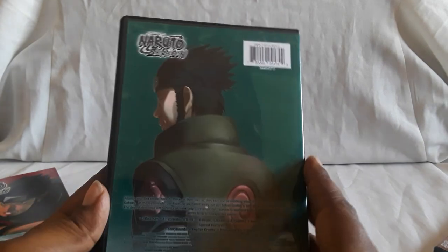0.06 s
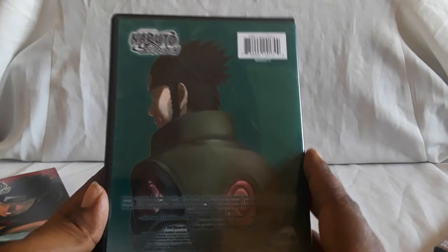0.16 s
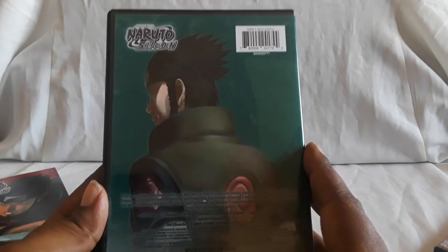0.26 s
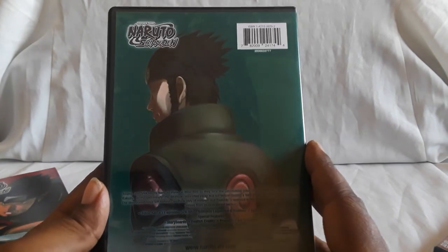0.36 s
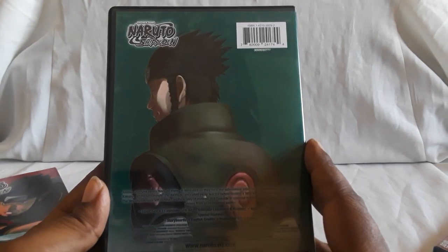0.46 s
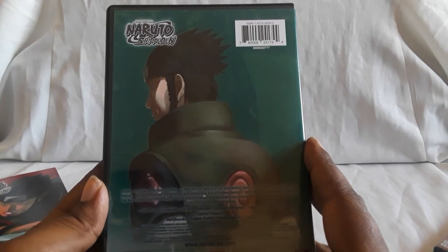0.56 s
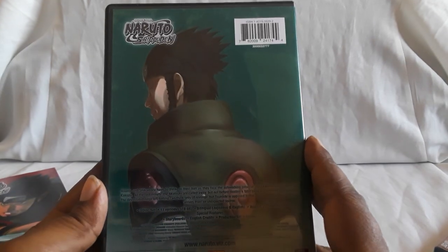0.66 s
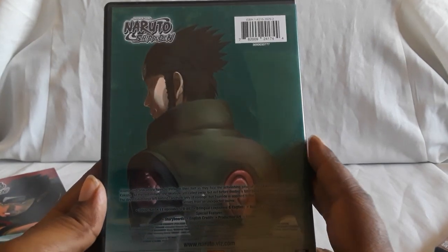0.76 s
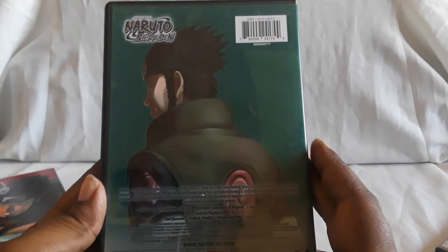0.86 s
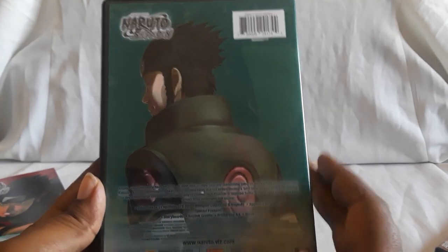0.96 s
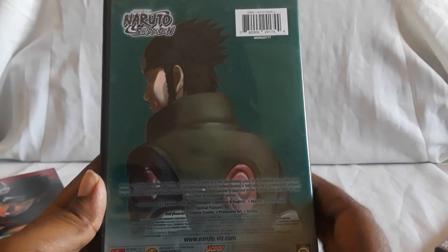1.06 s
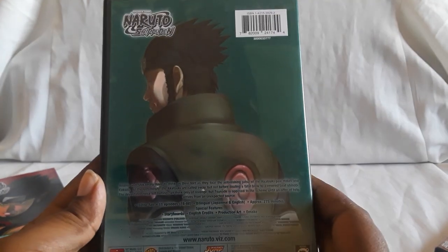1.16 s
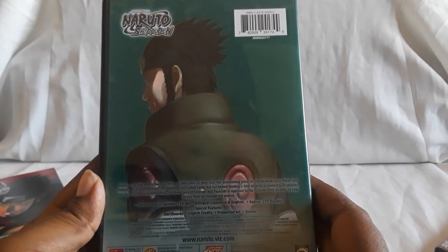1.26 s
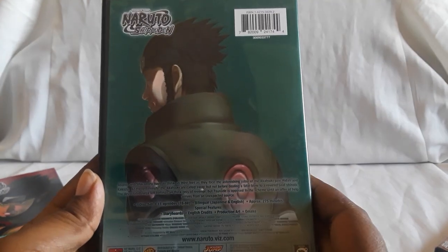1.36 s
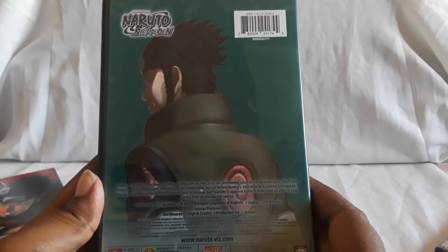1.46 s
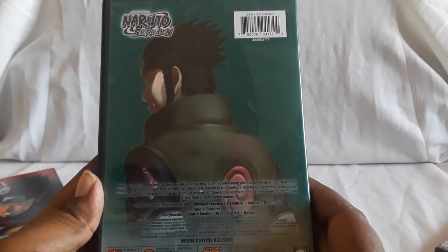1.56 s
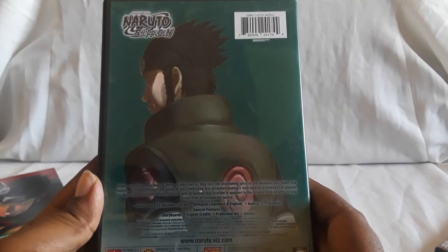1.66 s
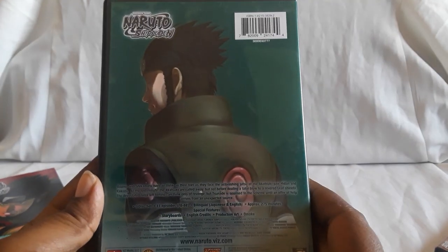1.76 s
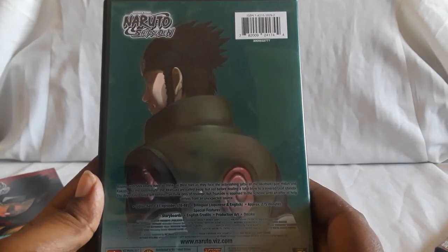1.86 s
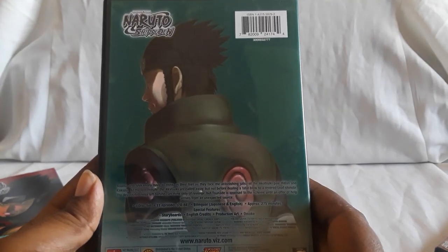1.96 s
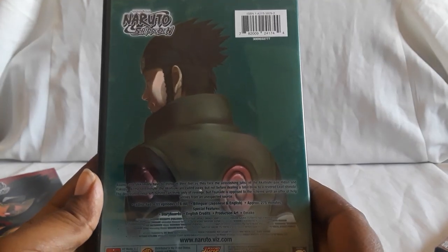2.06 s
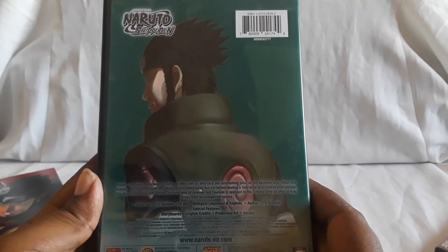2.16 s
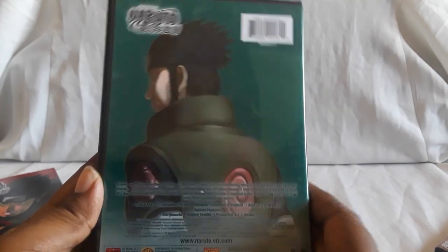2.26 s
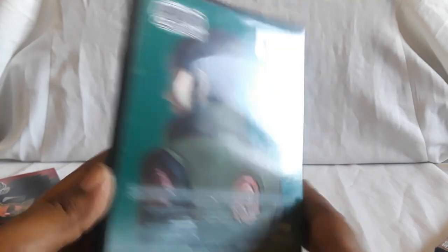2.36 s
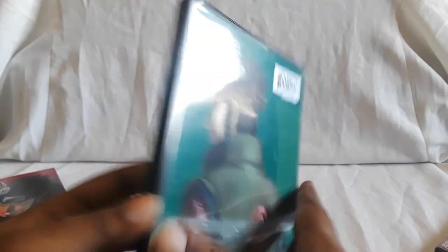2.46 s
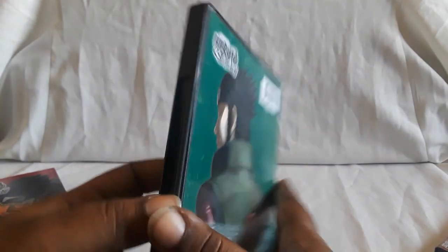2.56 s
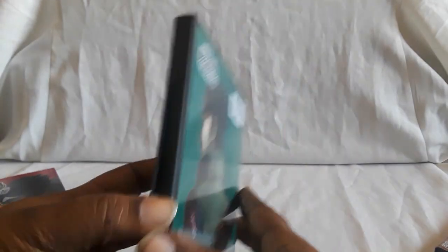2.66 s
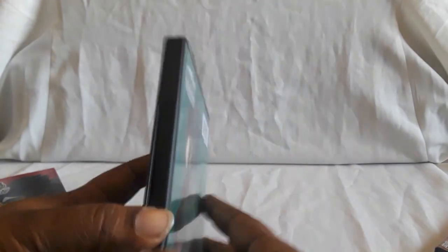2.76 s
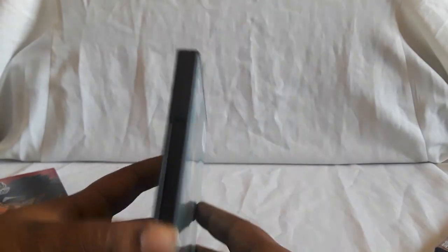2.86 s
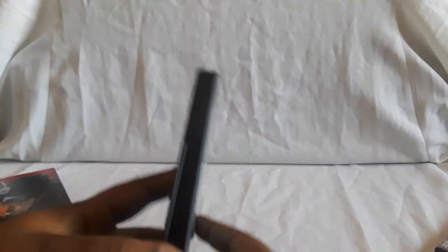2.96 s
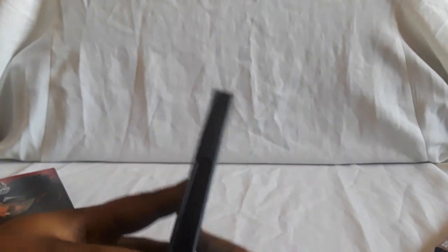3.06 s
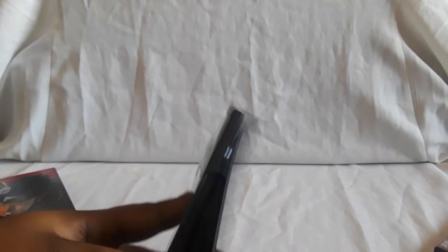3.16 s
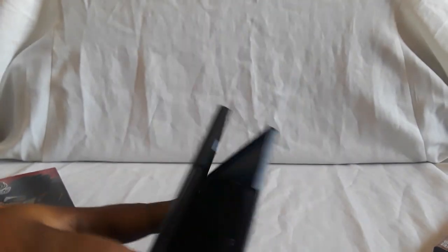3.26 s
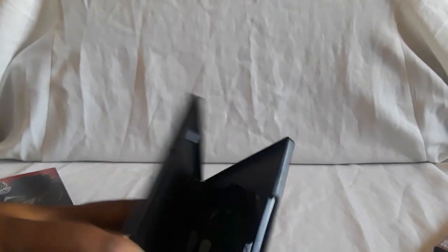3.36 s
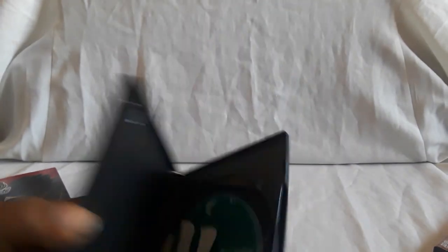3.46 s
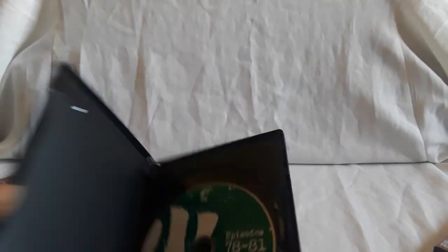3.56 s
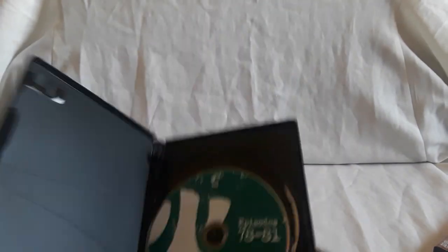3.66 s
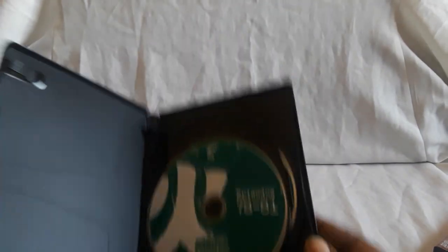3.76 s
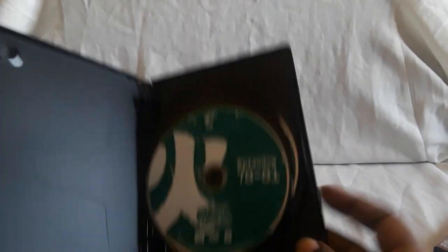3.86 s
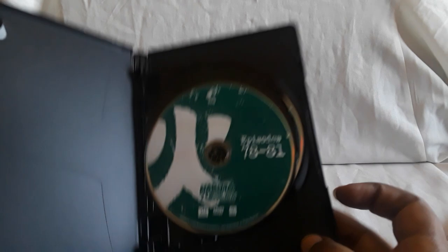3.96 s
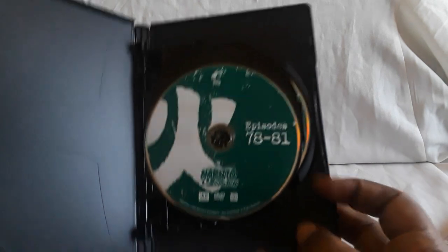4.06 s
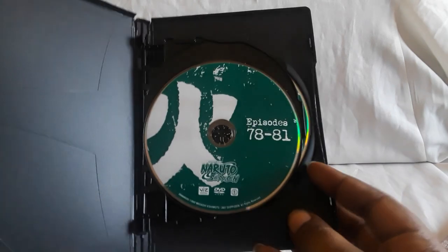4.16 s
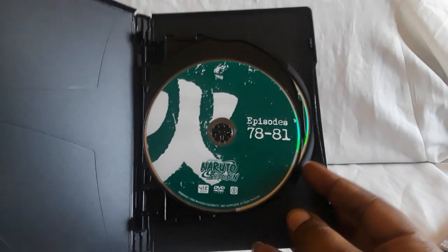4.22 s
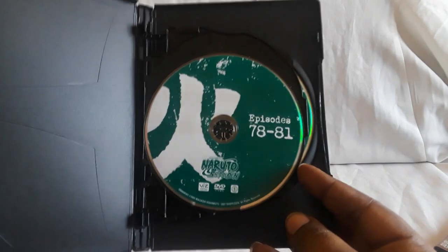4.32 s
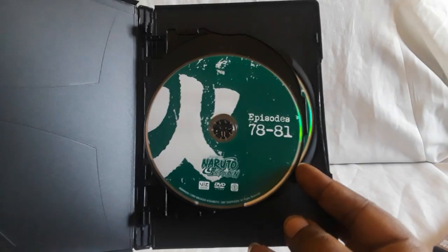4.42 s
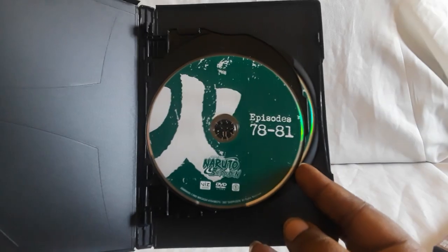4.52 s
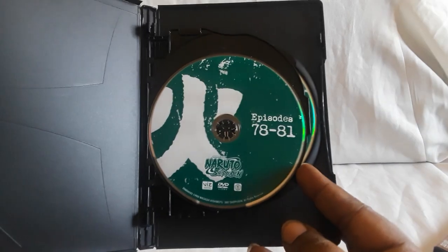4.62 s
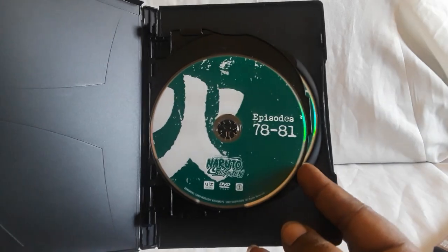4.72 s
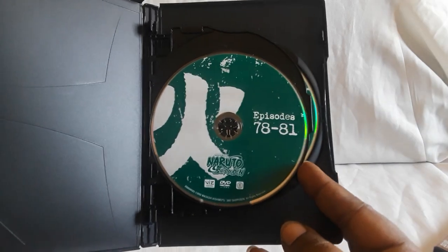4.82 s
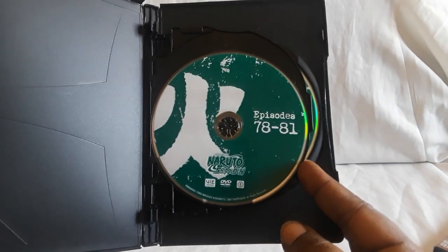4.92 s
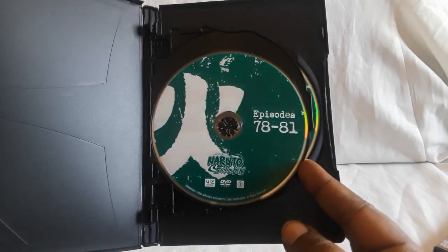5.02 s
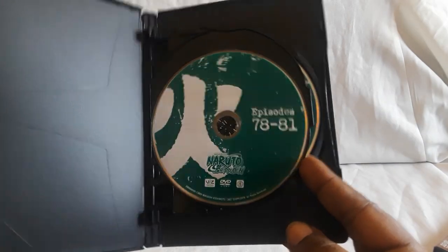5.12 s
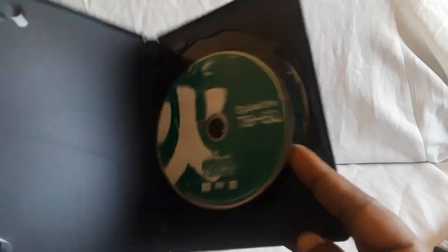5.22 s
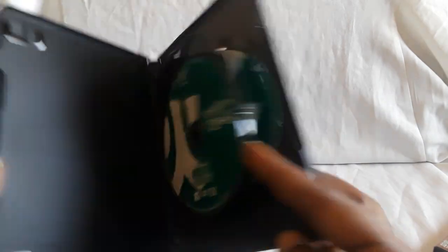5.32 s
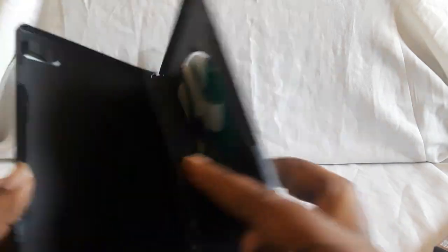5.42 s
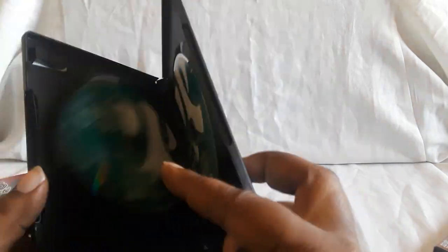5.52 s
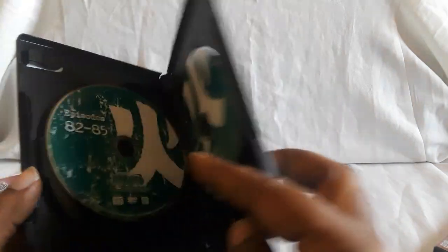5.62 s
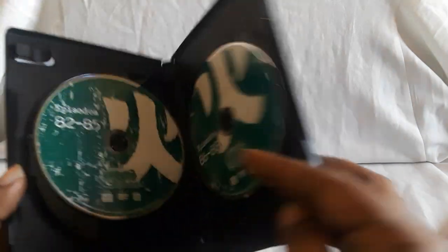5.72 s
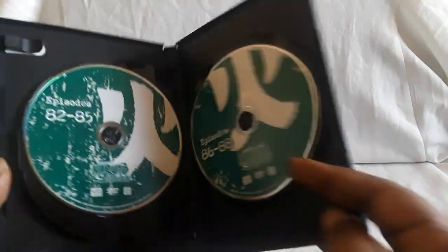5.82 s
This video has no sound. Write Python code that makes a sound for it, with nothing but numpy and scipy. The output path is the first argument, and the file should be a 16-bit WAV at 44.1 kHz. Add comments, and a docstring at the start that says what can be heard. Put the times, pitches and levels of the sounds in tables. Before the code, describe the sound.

A plastic disc case is rubbed, tapped and snapped open in a quiet room, and its inner tray flips over and clacks.

```python
"""Over the hum of a small, soft room, hands handle a plastic disc case with a few light clicks and rubs.
After 2 s they turn it over: fingers scrape, and each knock makes the thin shell ring briefly.
Just after 3 s two latches pop, shaking the discs and tray, and the case creaks and swings open.
From 4.5 s a bird outside, heard once before, chirps faintly five times.
Last, between two thin whistles, the inner tray flips over and lands with a clack at 5.6 s."""
import sys
import numpy as np
from scipy import signal
from scipy.fft import rfft, irfft
from scipy.io import wavfile
from scipy.ndimage import uniform_filter1d

SR = 44100
rng = np.random.default_rng(int(sys.argv[2]) if len(sys.argv) > 2 else 0)


def master_out(mix):
    """Clip the mix to full scale and print it as 16-bit PCM to the path in sys.argv[1]."""
    frames = np.transpose(np.atleast_2d(mix))
    ceiling = np.clip(frames, -1, 1)
    pcm = np.round(ceiling * 32767).astype(np.int16)
    wavfile.write(sys.argv[1], SR, pcm)


N = 259572

# The shell's modes, the tones it rings at: f/Hz, level/dB, base time to fade by 60 dB/s
SHELL_MODES = [(489.3, -12.5, 0.039), (665, -6, 0.013), (813, 3, 0.014), (1024, 0, 0.03), (1230, 1.5, 0.02),
               (1420, 4, .03), (1707, 5.5, 0.039), (1998, 2.5, 0.04), (2580, 7.5, 0.048), (2995, 9, 0.03),
               (3375, 6, 0.014), (3848, 6, .016), (4240, 7.5, 0.018)]


def amp(db):
    """Turns decibels into a volume factor."""
    return 10 ** (np.asarray(db) / 20)


def evened(x):
    """Scales a signal to an average power of 1."""
    return x / np.sqrt(np.mean(x ** 2) + 1e-30)


def wander(shape, samples):
    """A random curve: noise smoothed over some samples."""
    return evened(uniform_filter1d(rng.standard_normal(shape), size=samples))


def value_at(points, hz):
    """Reads between the rows of a (frequency, value) table."""
    f, value = np.transpose(points)
    return np.interp(np.log(hz + 1), np.log(f + 1), value)


def add(mix, start_s, sound):
    """Mixes a sound in at a given time."""
    part = mix[:, round(start_s * SR):][:, :sound.shape[-1]]
    part += sound[..., :part.shape[1]]


def coloured(x, spectrum):
    """Filters x by a spectrum and evens its level."""
    hz = np.fft.rfftfreq(x.shape[-1], 1 / SR)
    return evened(irfft(rfft(x) * amp(value_at(spectrum, hz)), x.shape[-1]))


def panned(x, time_s):
    """Places a sound left or right, where the case is at that time."""
    # Path of the case: t/s, left over right/dB
    path = [(0, 1), (2.5, -4.5), (3.1, 1), (3.6, -1), (4.3, 1.5), (5.89, 1)]
    pan_db = np.interp(time_s, *np.transpose(path))
    return x * amp(np.reshape([pan_db / 2, -pan_db / 2], (2, -1)))


def pitched(sound, speed):
    """Plays a sound faster and higher, or slower and lower."""
    n = np.arange(sound.shape[1])
    return np.array([np.interp(n * speed, n, side, right=0) for side in sound])


def room_hum():
    """Steady hum and hiss, alike on both sides in the bass, with a slight slow swell."""
    # Spectrum of the hum: f/Hz, relative level/dB
    spectrum = [(22, -22.5), (124, -2.5), (238, -8), (266, -13), (304, -4), (330, -18.5), (634, -13.5),
                (687, -9.5), (2210, -26), (3600, -33), (15600, -33.5), (16200, -51.5)]
    # How alike left and right are: f/Hz, likeness (1 = the same)
    likeness = [(60, 0.89), (180, 0.92), (550, -0.17), (1650, -0.46), (4970, -0.26), (15000, -0.14)]
    left, other = rng.standard_normal((2, N))
    same = value_at(likeness, np.fft.rfftfreq(N, 1 / SR))
    right = irfft(same * rfft(left) + np.sqrt(1 - same ** 2) * rfft(other), N)
    hum = coloured(np.array([left, right]), spectrum)
    swell = evened(uniform_filter1d(wander(N, 6000), size=6000))
    low = signal.sosfiltfilt(signal.butter(2, 2500, fs=SR, output="sos"), hum)
    return amp(-65.5) * (hum + (amp(2.5 * swell) - 1) * low) * amp([[-.6], [.6]])


def bird():
    """A bird whistles short, hoarse chirps that rise and fall, blurred by echoes."""
    # Chirps: middle t/s, top f/Hz, level/dB
    chirps = [(2.164, 2630, -77.5), (4.503, 2840, -77), (4.647, 2860, -76.5), (4.796, 2860, -78),
              (4.957, 2840, -74), (5.095, 2787, -75)]
    out, length_s = np.zeros((2, N)), .065
    u = np.linspace(-1, 1, round(length_s * SR))  # runs from a chirp's start to its end
    for middle, top_hz, db in chirps:
        start = middle - length_s / 2
        rough = 0.43 * wander(len(u), 120)
        hz = top_hz - 800 * u ** 2 * (1 + .2 * u) + 250 * rough
        chirp = np.sin(2 * np.pi * np.cumsum(hz) / SR) * np.hanning(len(u)) ** .25 * (1 + .5 * u)
        add(out, start, amp(db) * (1 + rough) * chirp)
        delays_s = np.sort(rng.uniform(.005, .045, (2, 12)))
        for (left, right), echo_db in zip(delays_s.T, np.linspace(-6, -18, 12)):
            add(out[:1], start + left, amp(db + echo_db) * chirp)
            add(out[1:], start + right, amp(db + echo_db) * chirp)
    return out


def whistles():
    """Faint, thin tones that waver in pitch and loudness."""
    # Tones: start t/s, end t/s, f/Hz, level/dB
    tones = [(5.188, 5.335, 6600, -81), (5.802, 5.897, 6840, -72)]
    out = np.zeros((2, N))
    for start, end, hz, db in tones:
        waver, flutter = wander((2, round((end - start) * SR)), 250)
        tone = (1 + 0.34 * flutter) * np.sin(2 * np.pi * np.cumsum(hz + 35 * waver) / SR)
        add(out, start, amp(db) * tone * signal.windows.tukey(len(tone), .4))
    return out


def room_echo(x):
    """The walls return a few early echoes, then a tail in which each pitch fades at its own speed."""
    # Early echoes: delay t/s, level/dB
    echoes = [(.0075, -7), (.0142, -7), (.0215, -13), (.046, -18.5)]
    # Fading of the tail: f/Hz, time to fade by 60 dB/s
    fade_times = [(150, 0.12), (400, 0.24), (1040, 0.18), (2760, 0.19), (7280, 0.17)]
    # The walls return less bass: f/Hz, level/dB
    wall_tone = [(150, -12.5), (800, -6.5), (2000, -3.5), (16000, -2.5)]
    taps = np.zeros((2, SR // 2))
    at = np.arange(480, SR // 2 - 20, 20)
    at = at + rng.integers(0, 20, (2, len(at)))
    np.put_along_axis(taps, at, rng.choice([-1., 1.], at.shape), 1)
    taps += 0.1 * taps[::-1]  # the sides mix a little
    hz, t, bands = signal.stft(taps, SR, nperseg=256)
    tail = signal.istft(bands * amp(-60 * t / value_at(fade_times, hz)[:, None]), SR, nperseg=256)[1]
    tail *= amp(-2.5) / np.linalg.norm(tail[0])
    for k, (delay, db) in enumerate(echoes):  # left and right take turns to hear it first
        tail[[k % 2, 1 - k % 2], round(delay * SR) + np.array([0, 9])] += amp(db)
    reflected = irfft(rfft(x.mean(axis=0)) * amp(value_at(wall_tone, np.fft.rfftfreq(N, 1 / SR))), N)
    return signal.fftconvolve(reflected[None], tail, axes=1)[:, :N]


def swinging():
    """Each swing of the case makes a low wobble."""
    # Swings: middle t/s, half length/s, level/dB
    swings = [(2.4, 0.091, -60), (2.748, 0.17, -55.5), (3.67, 0.036, -62.5), (4.202, 0.048, -58),
              (4.35, 0.043, -55), (5.419, 0.36, -73)]
    # Spectrum of the wobble: f/Hz, relative level/dB
    spectrum = [(15, -55), (25, -5), (43, -5), (130, -7.5), (350, -5.5), (460, -40), (600, -89)]
    t = np.arange(N) / SR
    loudness = sum(amp(db) * np.exp(-((t - middle) / half) ** 2) for middle, half, db in swings)
    return panned(loudness * coloured(rng.standard_normal(N), spectrum), t)


def rubbing():
    """Skin drags and plastic creaks: hiss and clumps of tiny slips sound through the shell."""
    # Fingers slide and the shell flexes: t/s, level/dB
    sliding = [(0, -65), (.1, -67.5), (.3, -89.5), (2.24, -88), (2.31, -67.5), (2.45, -61), (2.66, -57),
               (2.9, -61.5), (3.1, -64), (3.45, -69), (3.55, -58.5), (3.8, -70), (4.0, -65), (4.09, -86),
               (4.13, -65), (4.4, -69), (4.52, -77.5), (5.12, -81.5), (5.16, -69.5), (5.57, -68),
               (5.89, -62)]
    # Spectrum of the rustle before the shell shapes it: f/Hz, relative level/dB
    spectrum = [(240, -42), (400, 0), (1180, -1.5), (2320, -14.5), (3810, -23), (4450, -27.5),
                (7600, -24.5), (9000, -49), (11700, -84.5)]
    # Finger scrapes: peak t/s, level/dB, f/Hz, relative treble/dB, band width as a share of f
    scrapes = [(0.79, -60, 717, -27, 0.17), (2.681, -50, 1180, -39, 0.15), (2.751, -49.5, 1125, -18, 0.73),
               (3.848, -59, 810, -12, 0.13), (4.176, -56, 1860, -31, 0.2), (4.273, -48, 742, -28, 0.068),
               (5.292, -51, 1750, -37, 0.14), (5.775, -51.5, 1450, -11, 0.29)]
    slips_per_s, scrape_rise_s, scrape_fall_s = 600, 0.015, 0.018
    hz, t = np.fft.rfftfreq(N, 1 / SR), np.arange(N) / SR
    clumps = amp(2.5 * wander(N, 400))
    slips = amp(2.5 * np.minimum(rng.exponential(1, N), 2.8)) * (rng.random(N) < slips_per_s / SR)
    scratches = signal.lfilter([1], [1, -.975], slips) * rng.standard_normal(N)
    drag = .5 * rng.standard_normal(N) + 0.63 * evened(scratches * clumps)
    low_pass = 1 / (1 + (hz / 4500) ** 8)
    shell = sum(1 / (1 + (14 * (hz / f - 1)) ** 2) for f, _, _ in SHELL_MODES)
    rustle = rfft(coloured(drag, spectrum)) * (0.19 + shell)
    body = evened(irfft(rustle * low_pass, N))
    treble = evened(irfft(rustle * (1 - low_pass), N))
    rub = amp(np.interp(t, *np.transpose(sliding))) * (body + amp(-16.5) * treble)
    rubbed_shell = irfft(rfft(drag) * shell * low_pass, N)
    for peak, db, part_hz, treble_db, width in scrapes:
        scrape = evened(signal.lfilter(*signal.iirpeak(part_hz, 1 / width, SR), rubbed_shell))
        stroke = np.exp(-abs(t - peak) / np.where(t < peak, scrape_rise_s, scrape_fall_s))
        rub += amp(db) * stroke * (scrape + amp(treble_db) * treble)
    # A thumb presses along the seam: middle t/s, half length/s, level/dB, f/Hz
    thumb_press = (3, 0.65, -70.5, 1148.5)
    middle, half, db, seam_hz = thumb_press
    seam = evened(signal.lfilter(*signal.iirpeak(seam_hz, 2.5, SR), rubbed_shell))
    rub += amp(db) * np.exp(-((t - middle) / half) ** 4) * seam
    return panned(rub, t)


def rattle(click):
    """Discs and tray, shaken loose, tap on seven spots that each ring at their own pitch."""
    taps_per_s, fade_s = 450, .085
    t = np.arange(9000) / SR
    taps = rng.standard_normal((2, len(t))) * (rng.random(len(t)) < taps_per_s / SR) * (t > .004)
    taps *= amp(1.3 * wander(len(t), 250) - 60 * t / fade_s)  # dying away in clumps
    taps = np.diff(taps, prepend=0) + 0.27 * taps  # brighter
    spot = np.cumsum(rng.random(len(t)) < .02) % 7
    out = sum(signal.fftconvolve(pitched(click, speed), taps * (spot == k), axes=1)
              for k, speed in enumerate(np.geomspace(.8, 1.25, 7)))
    return amp(-2.5) * out / np.linalg.norm(taps[0])


def clicks():
    """Each knock cracks, rings the shell and thumps the lid; soft ones bounce, hard ones rattle."""
    # Light clicks: t/s, level/dB, f/Hz of the part struck, crack gain/dB, upper modes gain/dB
    light_clicks = [(0.018, -53, 775, -5, 8), (0.047, -42, 680, -29.5, -2), (0.776, -47.5, 845, -10, -6),
                    (0.805, -45, 695, -51, -2.5), (0.913, -45, 810, -16, -18), (2.329, -41, 1090, -20, -17),
                    (2.356, -38.5, 813, -18, -25), (2.384, -37, 805, -8.5, -24),
                    (2.41, -39, 1600, -14, -16), (2.438, -29.5, 1240, -22.5, 2),
                    (2.496, -36.5, 1430, -25, 1), (2.553, -30, 1050, -23.5, 0.5),
                    (2.591, -46, 996, -11, 10), (2.638, -31.5, 1020, -21.5, -7),
                    (2.668, -49, 1130, -24, 12), (2.688, -29, 1120, -28, -11), (2.716, -37.5, 1110, -8, 2),
                    (2.737, -33.5, 900, -21, 4.5), (2.828, -33, 970, -21, 3), (2.852, -48, 1900, -16, 11),
                    (2.889, -52.5, 1900, -5.5, 10), (2.926, -42.5, 960, -21, 0),
                    (2.959, -50, 1900, -27, 6.5), (3.143, -29, 1500, -9, 15), (3.249, -28, 1600, -22, 13),
                    (3.304, -30, 1300, -18, 1), (3.386, -29.5, 1830, -20, 1),
                    (3.623, -39.5, 2000, -11.5, 3), (3.638, -40, 750, -13, 6.5),
                    (3.669, -38.5, 830, -18, 2), (3.762, -40.5, 1880, -21, -4.5),
                    (3.884, -44.5, 750, -6, 4.5), (4.122, -46.5, 1890, -31, -2.5),
                    (4.189, -39, 700, -21, -6.5), (4.199, -50.5, 1910, -24, -10),
                    (4.273, -32, 780, -27.5, -25.5), (4.353, -34.5, 700, -18.5, -5),
                    (4.357, -34.5, 1870, -26, -5), (5.148, -49.5, 698, -26.5, -6),
                    (5.228, -48.5, 1810, -30, -7), (5.274, -37.5, 1690, -30, 1.5),
                    (5.295, -32, 1600, -26, 2), (5.3926, -30, 810, -25, -0.5), (5.499, -67.5, 1880, 7, -3),
                    (5.521, -56, 860, 0, 7), (5.605, -26, 910, -23.5, -5), (5.621, -27.5, 800, -23, -8),
                    (5.647, -34, 980, -18, -11), (5.659, -36, 800, -12, -11), (5.758, -35, 1200, -18, -11),
                    (5.825, -39, 1420, -11, -9)]
    # Two latches let go and rebound, then the tray lands: the same five columns, then
    # thump gain/dB, ring time factor, centre f/Hz of the upper modes
    hard_blows = [(3.1197, -9, 1100, -28, -23, -10, 1.16, 3763),
                  (3.1214, -3.5, 1402, -27.5, -3, -8.5, 0.68, 2600),
                  (3.2028, -1.5, 1877, -31.5, -9.5, -13, 0.99, 2710),
                  (3.2036, -7, 811, -17, -4, -7.5, 1.7, 2710),
                  (3.1331, -15, 1291, -15.5, -2.5, -18.5, 1.18, 2850),
                  (3.2155, -10.5, 1900, -9.5, 7, -21, 1.2, 4330),
                  (5.5894, -14, 1450, -7.5, 5.5, -13.5, 0.97, 3400),
                  (5.5950, -18.5, 1446, -18.5, 9, -10, 0.55, 2600),
                  (5.5983, -11.5, 500, -46, -14, -12.5, 0.56, 3000)]
    # Spectrum of the crack of contact: f/Hz, relative level/dB
    crack_spectrum = [(2000, -21.5), (3200, -7.5), (4700, -1.5), (7600, -4), (8800, -21), (14000, -16.5)]
    # The whole lid pumps air: f/Hz, level/dB, time to fade by 60 dB/s
    lid_modes = [(168.2, 6.5, 0.024), (306, -4.5, 0.054)]
    light_thump_db, held_ring, light_upper_hz = -13.5, 0.93, 3400  # holding fingers shorten the ring
    knocks = [row + (light_thump_db, held_ring, light_upper_hz) for row in light_clicks] + hard_blows
    out, t = np.zeros((2, N)), np.arange(2400) / SR
    hz, mode_db, fade_s = np.repeat(SHELL_MODES, 6, axis=0).T[:, :, None]  # six close tones a mode
    fade_s = np.minimum(fade_s, 18 / hz)  # plastic rings for few cycles
    detunes = rng.uniform(-.06, .06, (len(knocks), len(hz), 1))
    phases = rng.uniform(-0.2, 0.5, (len(knocks), 2, len(hz), 1))  # each side faces the shell its own way
    bounces_s = rng.uniform(.001, .006, (len(knocks), 3))
    noises = coloured(rng.standard_normal((len(knocks), 2, len(t))), crack_spectrum)
    thump = sum(amp(db - 60 * t / ring_s) * np.sin(2 * np.pi * f * t) for f, db, ring_s in lid_modes)
    thump *= 1 - np.exp(-t / 0.0055)
    for knock, detune, phase, delays, noise in zip(knocks, detunes, phases, bounces_s, noises):
        start, level_db, part_hz, crack_db, upper_db, thump_db, ring_factor, upper_hz = knock
        # Modes far from the struck pitches move less.
        lower = amp(-7 * np.log2(hz / part_hz) ** 2)
        upper = amp(upper_db - 20 * np.log2(hz / upper_hz) ** 2)
        strength = np.where(hz > 2300, upper, lower) * amp(mode_db - 60 * t / (ring_factor * fade_s))
        cycles = hz * (1 + detune) * t + phase * hz / 4000
        ring = (strength * np.sin(2 * np.pi * cycles)).sum(axis=1) * (1 - np.exp(-t / 0.00085)) ** 2
        crack = (noise + 0.091 * noise[::-1]) * amp(crack_db - 60 * t / 0.017) * (1 - np.exp(-t / 0.0002))
        click = panned(amp(level_db) * (0.26 * ring + amp(thump_db) * thump + crack), start)
        add(out, start, click)
        if level_db < -28:
            for delay in delays:  # each bounce lands on a nearby spot, so its pitch shifts
                add(out, start + delay, 0.34 * pitched(click, 1 + 30 * (delay - .0035)))
        else:
            add(out, start, rattle(click))
    return out


def scene():
    """The case and its echo, with the bird, the whistles and the hum behind."""
    case = clicks() + rubbing() + swinging()
    bass_cut = signal.butter(3, 67, "high", fs=SR, output="sos")  # a small microphone loses deep bass
    return signal.sosfilt(bass_cut, case + room_echo(case)) + bird() + whistles() + room_hum()


def record(dry):
    """Cuts the highest treble, above 16250 Hz."""
    low_pass = signal.firwin(255, 16250, window=("kaiser", 9), fs=SR)
    return signal.oaconvolve(dry, low_pass[None], "same")


dry = scene()
out = record(dry)
master_out(out)
```